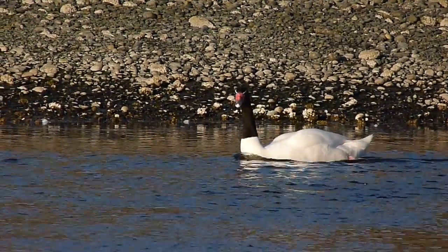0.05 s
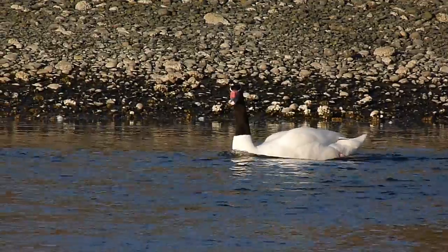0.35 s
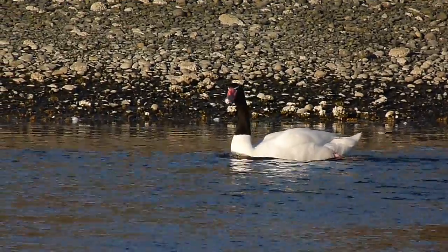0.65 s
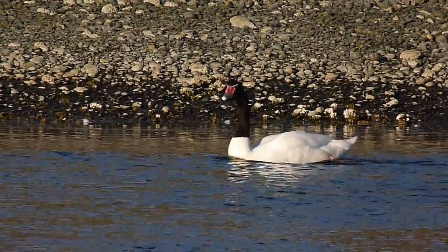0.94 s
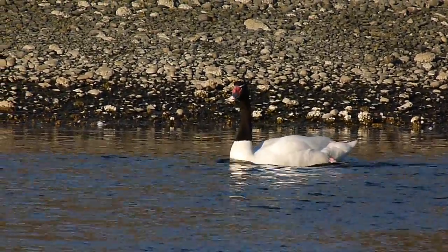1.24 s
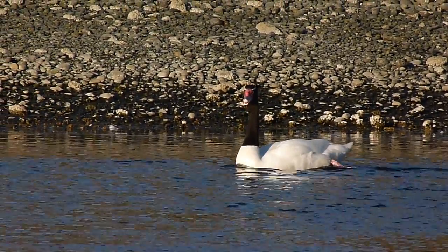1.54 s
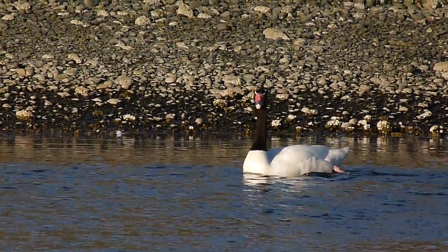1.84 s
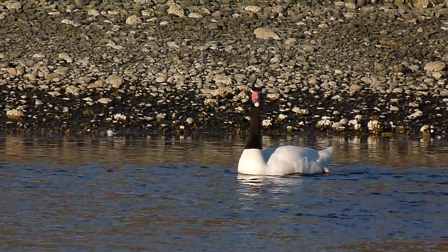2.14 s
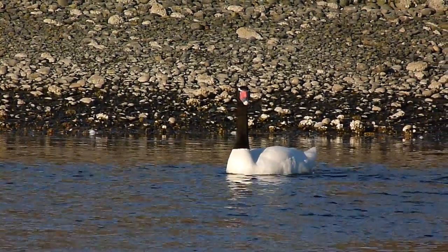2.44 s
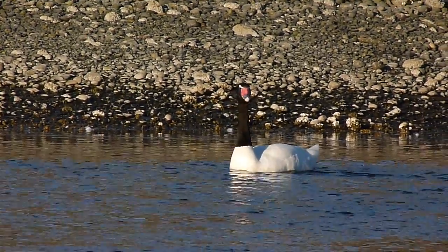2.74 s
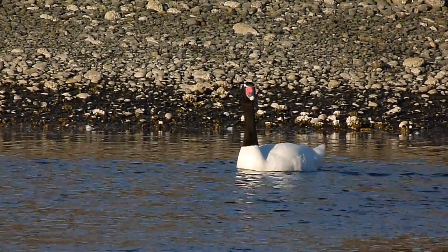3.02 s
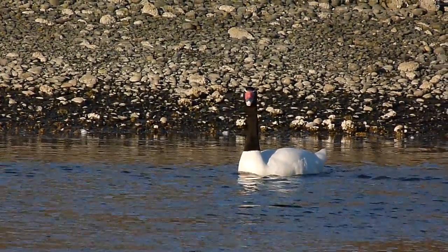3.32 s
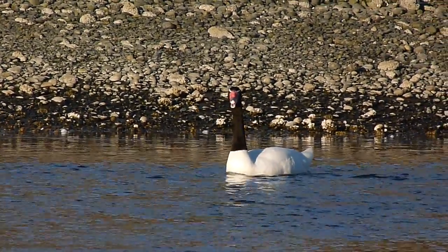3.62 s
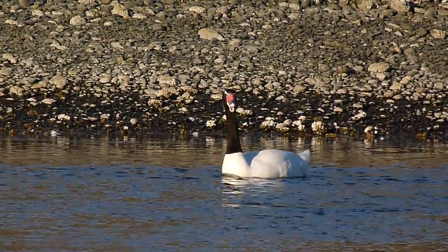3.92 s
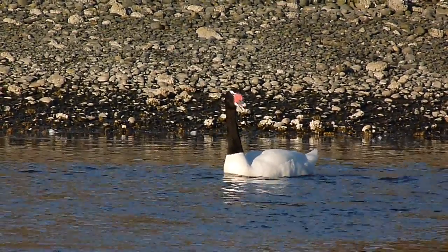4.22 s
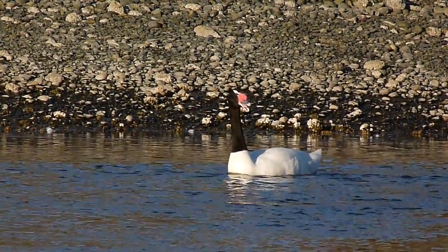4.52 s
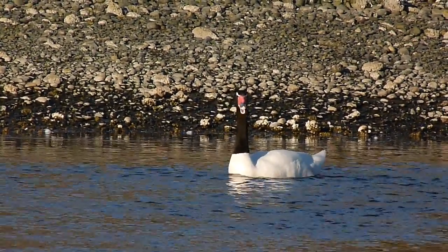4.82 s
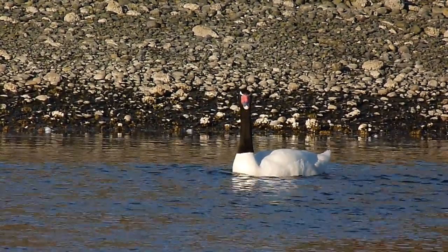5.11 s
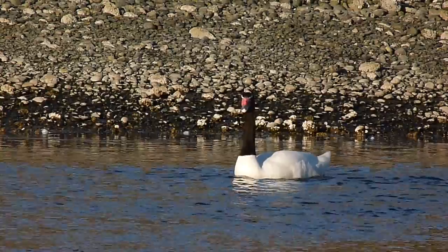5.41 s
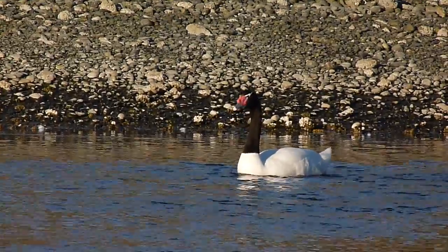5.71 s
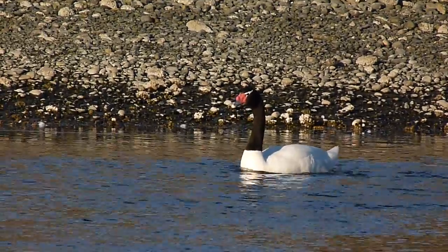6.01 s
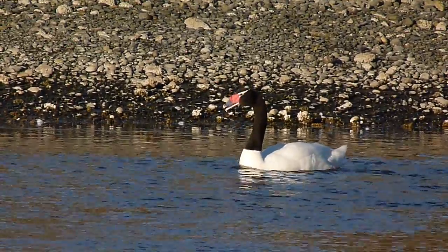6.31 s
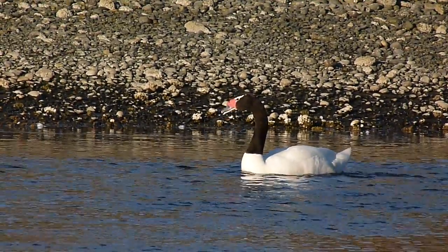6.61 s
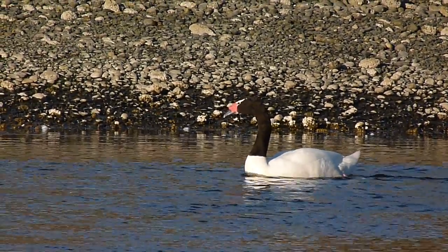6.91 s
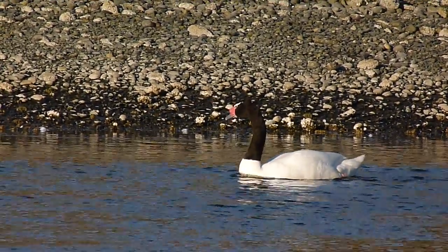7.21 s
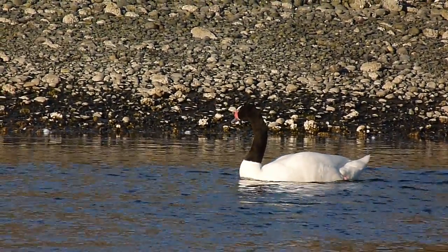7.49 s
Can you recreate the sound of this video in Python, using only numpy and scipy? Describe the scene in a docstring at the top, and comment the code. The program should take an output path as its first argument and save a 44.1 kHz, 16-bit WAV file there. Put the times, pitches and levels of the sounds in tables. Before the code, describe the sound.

Water washes softly on a stony shore throughout, a low lapping under a smooth hiss. At about 0.4 seconds a swan starts a run of short, wheezy whistles, each about a tenth of a second long, rising quickly and then dropping in pitch. From 1.2 seconds they come evenly, three or four a second, with a light echo off the bank. Another bird further off gives faint, hoarse peeps at 2.5 and 3.6 seconds. Tiny drips tick near the start and between 3.6 and 4.6 seconds. At 4.7 seconds a nearby water bird squawks once, the loudest sound, a brief reedy rasp that breaks higher and sinks. Small plops follow at 5.8 and 7 seconds. From about 5.5 seconds the whistles slow and become quieter, duller and more echoing as the swan turns away, the last at about 7.3 seconds.

```python
"""Water washes softly on a stony shore, with a few drops and plops. A black-necked swan paddles by,
giving a run of short, wheezy whistles that rise and fall, and turns away at the end. Its voice organ
(the syrinx) makes each tone, and the long windpipe pulls the pitch towards its own ringing notes.
Two faint peeps come from further off, and another water bird squawks once, close by: these calls are
pulses and rasping air shaped by a throat. The stones and the bank throw the calls back."""
import sys
import numpy as np
from scipy import signal
from scipy.fft import rfft, irfft
from scipy.io import wavfile
from scipy.ndimage import uniform_filter1d

SR = 44100
rng = np.random.default_rng(int(sys.argv[2]) if len(sys.argv) > 2 else 0)


def int16_out(signal):
    """Quantize to a 16-bit WAV file."""
    q = np.round(np.clip(np.atleast_2d(signal).T, -1, 1) * 32767)
    wavfile.write(sys.argv[1], SR, q.astype(np.int16))


N = 332955

# the notes at which the swan's long windpipe rings: f/Hz
WINDPIPE_NOTES = [600, 910, 1270, 1705, 2000]


def amp(db):
    """Turns decibels into a number to multiply by."""
    return 10 ** (np.asarray(db) / 20)


def unit(x):
    """Scales a signal so that its average strength (rms) is 1."""
    return x / np.sqrt(np.mean(x ** 2) + 1e-20)


def read(points, hz, column=1):
    """Looks up a table between its rows, on a log-frequency scale."""
    table = np.array(points, float)
    return np.interp(np.log(hz + 1), np.log(table[:, 0] + 1), table[:, column])


def colour(x, points):
    """Turns each frequency up or down, following a table of f/Hz, level/dB."""
    return irfft(rfft(x) * amp(read(points, np.fft.rfftfreq(len(x), 1 / SR))), len(x))


def wander(size, hz):
    """A random wobble of strength 1, no faster than about hz."""
    f = np.fft.rfftfreq(8192, 1 / SR)
    return unit(irfft(rfft(rng.standard_normal(8192)) / (1 + (f / hz) ** 4))[:size])


def add(mix, start_s, sound):
    """Mixes a sound in at its start time."""
    part = mix[:, max(round(start_s * SR), 0):][:, :sound.shape[-1]]
    part += sound[..., :part.shape[1]]


def all_around(spectra, hz):
    """Sound from all sides: most alike at the two ears near 200 Hz, unrelated in the treble."""
    # how alike the two ears are: f/Hz, likeness/0-1
    likeness = [(40, 0.2), (100, 0.16), (200, 1), (600, 0.66), (1500, 0.38), (3000, 0), (8000, 0)]
    alike = np.clip(read(likeness, hz), 0, 1)
    return np.array([spectra[0], alike * spectra[0] + np.sqrt(1 - alike ** 2) * spectra[1]])


def water_wash(level_db=-57.8, patchy_db=1.7, swell=0.95):
    """A low wash of water swells and laps under a smooth hiss."""
    # tone colour of the wash and hiss: f/Hz, level/dB
    hiss_colour = [(15, -64), (25, -25), (113, -25), (160, -24), (270, -4.3), (582, -7.5), (684, -11),
                   (1020, -8), (1240, -10), (1380, -7), (1950, -14), (2120, -16), (2360, -16),
                   (5140, -17.5), (15500, -26)]
    # rise and fall of the water on the stones, in two stretches: t/s, level/dB
    wash_levels = [
        [(0.0, -66), (0.75, -70), (1.6, -67), (1.91, -71), (2.23, -68), (2.66, -69), (2.89, -63), (3.54, -68),
         (4.55, -70)],
        [(5.2, -70), (5.64, -72), (5.89, -71), (6.21, -64), (6.62, -67), (6.88, -66), (7.02, -70), (7.26, -71),
         (7.4, -70)],
    ]
    frames, hz = N // 256 + 5, np.fft.rfftfreq(1024, 1 / SR)
    real, imag = rng.standard_normal((2, 2, frames, len(hz)))
    patches = uniform_filter1d(rng.standard_normal((frames, len(hz))), size=14, axis=0)
    patches = unit(uniform_filter1d(patches, size=8, axis=1))
    wash_db = np.interp(np.arange(frames) * 256 / SR, *np.vstack(wash_levels).T)[:, None]
    lapping_db = swell * (wash_db - wash_db.mean()) + patchy_db * patches
    # the lapping moves the low sounds most: f/Hz, share/0-1
    watery = read([(100, .2), (220, 1), (450, .75), (900, .46), (2000, .15), (5000, .061)], hz)
    spectra = all_around(real + 1j * imag, hz) * amp(read(hiss_colour, hz) + watery * lapping_db)
    _, wash = signal.istft(spectra.transpose(0, 2, 1), nperseg=1024, noverlap=768)
    return amp(level_db) * unit(wash[:, :N])


def drops(centre_hz=5600, width_octaves=.45, decay_s=.0015, left_db=3.5, faint_count=8, faint_db=-59):
    """Each drop of water is a brief, high tick; the faint ones fall at random times."""
    # the clearest drops: t/s, level/dB
    clear_drops = [(.1915, -51), (3.612, -50.5), (3.712, -52), (3.8943, -50), (3.98, -50), (4.5818, -53)]
    faint_drops = [(start, faint_db) for start in rng.uniform(0, N / SR, faint_count)]
    out, t = np.zeros((2, N)), np.arange(2048) / SR
    hz = np.fft.rfftfreq(len(t), 1 / SR)
    band = np.exp(-.5 * (np.log2((hz + 1) / centre_hz) / width_octaves) ** 2)
    for start, db in clear_drops + faint_drops:
        burst = unit(irfft(rfft(rng.standard_normal((2, len(t)))) * band))
        tick = unit(burst + .5 * burst[::-1]) * np.exp(-t / decay_s)  # each ear gets some of the other
        add(out, start, amp(db) * tick * amp([[left_db], [0]]))
    return out


def plops(decay_cycles=14, rise_per_s=2):
    """Each bubble rings briefly, rising in pitch."""
    # bubbles at the stones: t/s, level/dB, f/Hz
    bubbles = [(5.803, -43, 1950), (6.968, -57, 540), (6.998, -55, 640)]
    out, t = np.zeros((2, N)), np.arange(SR // 10) / SR
    for start, db, hz in bubbles:
        cycles = hz * t * (1 + rise_per_s * t / 2)
        envelope = np.minimum(cycles / 2, 1) * np.exp(-cycles / decay_cycles)
        add(out, start, amp(db) * envelope * np.sin(2 * np.pi * cycles))
    return out


def shore_echo(x, echo_db, stones_db=-25, stones_ring_s=.15, bank_s=.046, far_ring_s=1.0, dull_hz=4600):
    """Sound scatters off near stones, then returns duller from the bank, with a faint far tail."""
    t = np.arange(SR * 2 // 3) / SR
    hz = np.fft.rfftfreq(len(t), 1 / SR)
    near, late = rng.standard_normal((2, 2, len(t))) / np.sqrt(len(t))
    near *= amp(stones_db) * unit(amp(-60 * t / stones_ring_s))
    bank = amp(-19) * unit(np.exp(-.5 * ((t - bank_s) / .034) ** 2))
    far = amp(-25) * unit(amp(-60 * t / far_ring_s))
    late *= amp(echo_db) * np.hypot(bank, far)
    spectra = rfft(near) + rfft(late) / (1 + (hz / dull_hz) ** 4)
    return signal.fftconvolve(x[None], irfft(all_around(spectra, hz), len(t)), axes=1)


def to_one_side(x, left_db, echo_db, lag_samples=2.4):
    """Places a bird off to one side, with its echo; its call reaches the left a little late."""
    late = irfft(rfft(x) * np.exp(-2j * np.pi * lag_samples * np.fft.rfftfreq(len(x))), len(x))
    out = shore_echo(x, echo_db)
    add(out, 0, np.array([late, x]) * amp([[left_db / 2], [-left_db / 2]]))
    return out


def reedy_note(hz, db, rough, doubling, treble_db, throat, shimmer_db=3, rasp=.98):
    """Uneven pulses and rasping air pass a throat; doubling makes pulses strong and weak by turns."""
    size, rough = len(hz), np.clip(rough, 0, 1)
    jitter = (.004 + .0405 * rough) * wander(size, 300)
    phase = 2 * np.pi * np.cumsum(hz * (1 + jitter)) / SR
    k = np.arange(2, 50)[:, None] / 2  # whole multiples of the pitch and the halves between them
    height = amp(read(throat, k * hz)) * np.where(k % 1, doubling, 1)
    wobble = np.array([wander(size, 64) for _ in k])
    height *= amp(shimmer_db * np.minimum(k * hz / 3000, 1) * wobble)  # high overtones waver most
    throat_gain = amp(read(throat, abs(np.fft.fftfreq(SR)) * SR))
    lag = np.imag(signal.hilbert(np.log(throat_gain)))  # the throat rings after each pulse
    pulses = (height * np.cos(k * phase - lag[(k * hz).astype(int) % SR])).sum(0)
    pulses /= np.sqrt((height ** 2).sum(0) / 2)
    air = unit(colour(rng.standard_normal(SR)[:size] * (1 + .7 * np.cos(phase)), throat))
    voice = ((1 - rough) * pulses + rasp * rough * air) / np.hypot(1 - rough, rasp * rough)
    dark = colour(voice, [(1600, 1.5), (2400, -34)])
    return amp(db) * (dark + amp(treble_db) * (voice - dark)) * signal.windows.tukey(size, .04)


def arch(length, top_s, top_hz, top_db, scoop, droop, attack_db, fade_db):
    """Time, pitch and level of a note that scoops up to its top and droops as it fades."""
    t = np.arange(0, length, 1 / SR)
    before = np.maximum(1 - t / top_s, 0)
    after = np.maximum(t - top_s, 0) / (length - top_s)
    hz = top_hz * (1 - scoop * before ** 2 - droop * after ** 2)
    return t, hz, top_db + attack_db * before ** 2 + fade_db * after ** 1.4


def peeps():
    """A bird further off gives two short, hoarse notes that rise and fall."""
    # the peeps: t/s, length/s, time to the top/s, top f/Hz, level/dB
    notes = [(2.478, .067, .023, 865, -47), (3.617, .052, .022, 875, -45.5)]
    # tone colour of this bird's throat: f/Hz, level/dB
    throat = [(400, -25), (850, -2.5), (1700, -1), (2100, -16), (2600, 5), (3000, -15), (3500, -10),
              (7000, -32)]
    out = np.zeros((2, N))
    for start, *shape in notes:
        _, hz, db = arch(*shape, scoop=.17, droop=.16, attack_db=-12, fade_db=-12)
        peep = reedy_note(hz, db, rough=.26, doubling=.12, treble_db=0, throat=throat)
        add(out, start, to_one_side(peep, left_db=3.0, echo_db=-2))
    return out


def squawk_opening(start=4.712, catch_s=4.754, catch_time_s=.006, fray_s=4.79, fray_time_s=.056):
    """With the beak open, a low, quiet rasp catches into a reedy note, then frays as it lets go."""
    # tone colour of the throat with the beak open: f/Hz, level/dB
    throat = [(100, -65), (380, -16), (720, -28.5), (930, -4.5), (1150, -1), (1550, 0.5), (1800, -24),
              (2100, -27), (2300, -16), (2700, -10), (3300, -23), (4000, -15), (4900, -25), (8000, -38),
              (14000, -75)]
    # the voice's three states: f/Hz, level/dB, roughness/0-1, treble/dB
    rasping, caught, frayed = (295, -32, .65, 0), (378, -24.3, .11, 4.5), (352, -32, .5, 6)
    t = np.arange(start, fray_s + fray_time_s, 1 / SR)[:, None]
    catch = 1 / (1 + np.exp((catch_s - t) / catch_time_s))
    fray = (np.maximum(t - fray_s, 0) / fray_time_s) ** 3
    state = (1 - catch) * rasping + catch * caught
    hz, db, rough, treble_db = (state * (1 - fray) + fray * frayed).T
    note = reedy_note(hz, db, rough, doubling=.14, treble_db=treble_db, throat=throat)
    out = np.zeros((2, N))
    add(out, start, to_one_side(note, left_db=1.2, echo_db=-4))
    return out


def squawk_closing(crack_s=4.9, crack_width_s=.013):
    """As the beak closes, the squawk breaks to a higher note that dulls, cracks briefly and sinks."""
    # tone colour of the throat with the beak closing: f/Hz, level/dB
    throat = [(100, -52), (460, -13.5), (650, -28), (860, 0), (1150, -6), (1400, -8.5), (1900, -25),
              (2350, -18.5), (2750, -16), (3300, -24), (4200, -22), (4800, -36), (8000, -49), (14000, -80)]
    # the higher note: t/s, length/s, time to the top/s, top f/Hz, level/dB
    high_note = (4.826, .146, .039, 474, -28)
    start, *shape = high_note
    t, hz, db = arch(*shape, scoop=.07, droop=.24, attack_db=-10, fade_db=-16)
    crack = .9 * np.exp(-((start + t - crack_s) / crack_width_s) ** 2)
    note = reedy_note(hz, db, rough=.12 + .2 * crack, doubling=crack, treble_db=3.5 - 55 * t,
                      throat=throat)
    out = np.zeros((2, N))
    add(out, start, to_one_side(note, left_db=-2.5, echo_db=-4))
    return out


def direct_path(x):
    """Each pitch of the whistle reaches left and right with a different level and delay."""
    # left compared with right, towards the swan: f/Hz, level/dB, phase lead/rad
    sides = [(850, 0.5, 0.34), (1399.5, -1.5, -0.32), (1740, 1, -0.48), (2080.4, -4, -0.8),
             (2790, -7.5, 1.4), (3150, 1.5, 2.08), (4080, 8.5, 0.82), (4400, -1, -0.73), (5900, 6, -1.1),
             (7000, -12.5, 0.35), (9100, 0.5, 1.16), (11000, 1.5, 0.47)]
    hz = np.fft.rfftfreq(len(x), 1 / SR)
    half = amp(read(sides, hz) / 2) * np.exp(.5j * read(sides, hz, column=2))
    return irfft(rfft(x) * np.array([half, 1 / half]), len(x))


def whistle_pitch(t, top_hz, start_hz=900, rise_s=.039, fall_s=.065, fall_octaves=1.9, jitter=.006):
    """The syrinx aims up, sags, then drops; the pitch hops from one windpipe note to the next."""
    # the aim sags faster in gentler calls: top f/Hz, sag/(Hz per s)
    sag_rates = [(1780, 11500), (2000, 4800)]
    give, fall_give = .4, .2  # share of the syrinx's pull that the pitch follows, before and in the fall
    notes = np.array(WINDPIPE_NOTES)
    notes = notes[:abs(notes - top_hz).argmin() + 1]  # a gentle call never reaches the upper ones
    top_aim = notes[-1] + (top_hz - notes[-1]) / give
    rise = top_aim - (top_aim - start_hz) * np.maximum(1 - t / rise_s, 0) ** 1.35
    sag = read(sag_rates, top_hz) * np.clip(t - rise_s, 0, fall_s - rise_s)
    fall = 2 ** np.interp(t, [fall_s, t[-1]], [0, -fall_octaves])
    aim = np.maximum((rise - sag) * fall, notes[0])
    nearest = notes[abs(aim[:, None] - notes).argmin(1)]
    hz = nearest + np.where(t < fall_s, give, fall_give) * (aim - nearest)
    return uniform_filter1d(hz, size=70) * (1 + jitter * wander(len(t), 390))


def whistle(length, top_hz, db, overtones_db, attack_s=.009, fade_db=-19.5, push_s=.042,
            flutter_db=1.4, hoarse_db=1.7):
    """A nearly pure tone; overtones and wheeze swell with the air pressure, which peaks at push_s."""
    # tone colour of the main tone, of the overtones and of the wheeze: f/Hz, level/dB
    neck_colour = [(600, .3), (920, .5), (1300, -1.3), (1680, 1), (1820, -6), (1950, -1.8), (2050, -1.5)]
    bill_colour = [(1200, -30), (2300, -42), (2750, -17.5), (3050, -27), (3300, -16), (3500, -14.5),
                   (3750, -17), (4030, -4.5), (4300, -15), (4800, -19), (5200, -13.5), (5600, -30),
                   (6000, -13), (6600, -24), (8000, -21), (10000, -16.5), (12000, -23)]
    wheeze_colour = [(300, -26.5), (900, 0.5), (1700, 4.5), (2300, -8), (2750, -6), (3100, -5), (4200, 2),
                     (5500, -6.5), (6700, -20.5), (8500, -16), (10000, -20), (11200, -32), (13000, -26),
                     (15500, -36)]
    # gentler calls start to fade sooner: top f/Hz, t/s
    fade_starts = [(1440, .06), (1780, .066), (2000, .079)]
    t = np.arange(0, length, 1 / SR)
    hz = whistle_pitch(t, top_hz)
    phase = 2 * np.pi * np.cumsum(hz) / SR
    push_db = -10 * ((t - push_s) / .032) ** 2
    overtones = sum(amp(read(bill_colour, k * hz) - 6 * (k - 2)) * np.sin(k * phase)
                    for k in range(2, 7))
    overtones *= amp(overtones_db + push_db + hoarse_db * wander(len(t), 300))
    tone = np.sqrt(2) * (amp(read(neck_colour, hz)) * np.sin(phase) + overtones)
    puffs = rng.standard_normal(SR)[:len(t)] * (1 + .96 * np.cos(phase))  # air escapes once a cycle
    wheeze = unit(colour(puffs, wheeze_colour))
    wheeze_db = -10.3 + .55 * push_db + 13 * np.log2(top_hz / WINDPIPE_NOTES[-1])  # higher is wheezier
    voice = tone * amp(flutter_db * wander(len(t), 180)) + amp(wheeze_db) * wheeze
    fading = np.interp(t, [read(fade_starts, top_hz), length], [0, 1])
    envelope = np.minimum(t / attack_s, 1) * amp(db + fade_db * fading ** .7)
    return envelope * voice * signal.windows.tukey(len(t), .06)


def swan():
    """Whistles arrive directly and off the shore; turning away dulls them and brings up the echo."""
    # the whistles: t/s, length/s, top f/Hz, level/dB
    calls = [ (.43, .13, 1745, -34.5), (.898, .108, 1440, -32.5), (1.239, .117, 1990, -33.5),
             (1.569, .11, 1750, -31.5), (1.831, .113, 1985, -34), (2.098, .106, 1765, -32),
             (2.366, .114, 2005, -34), (2.649, .11, 2010, -34.5), (2.918, .111, 2010, -35),
             (3.2, .116, 2012, -35), (3.491, .112, 2003, -35), (3.774, .118, 2005, -35),
             (4.066, .115, 2012, -35), (4.347, .118, 2005, -34.5), (4.658, .116, 2015, -34.5),
             (4.971, .12, 2008, -34.5), (5.298, .114, 2000, -35), (5.637, .117, 1995, -36.5),
             (6.003, .12, 1995, -38), (6.376, .112, 1780, -38.5), (6.748, .114, 1785, -38),
             (7.246, .12, 1780, -40)]
    # boost of the overtones through the run: t/s, level/dB
    overtone_levels = [(.4, .5), (2.1, 0), (2.4, 3.4), (5.3, 3.2), (6, 2.5), (6.4, 6.5)]
    # how far the bill points away: t/s, amount (0 is facing the listener)
    turning = [(5.3, 0), (6.0, .3), (6.4, .9), (7.25, 1.2)]
    out = np.zeros((2, N))
    for start, length, top_hz, db in calls:
        turned = np.interp(start, *np.transpose(turning))
        overtones_db = np.interp(start, *np.transpose(overtone_levels))
        call = np.pad(whistle(length, top_hz, db, overtones_db), (0, 500))
        call = colour(call, [(3700, 0), (6000, -5 * turned)])
        add(out, start, direct_path(call))
        add(out, start, shore_echo(call, echo_db=5.8 + 5 * turned))
    return out


def scene():
    """All the sounds at the water's edge, added together."""
    return swan() + squawk_opening() + squawk_closing() + peeps() + drops() + plops() + water_wash()


def record(dry):
    """Cuts off the very highest treble."""
    low_pass = signal.firwin(711, cutoff=15720, window=("kaiser", 9), fs=SR)
    return signal.oaconvolve(dry, low_pass[None], "same")


dry = scene()
out = record(dry)
int16_out(out)
```